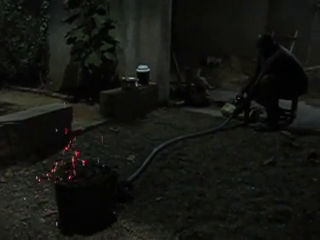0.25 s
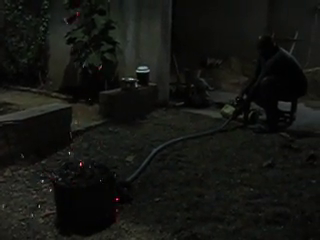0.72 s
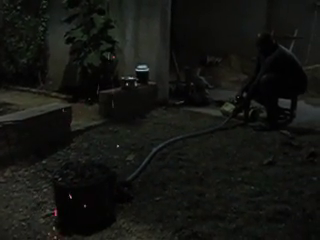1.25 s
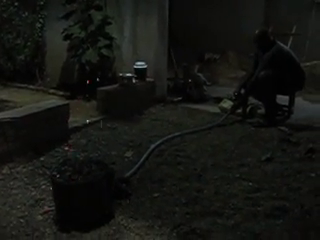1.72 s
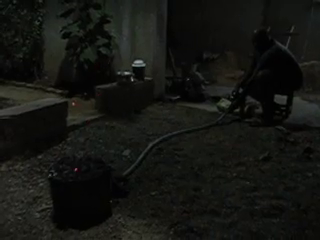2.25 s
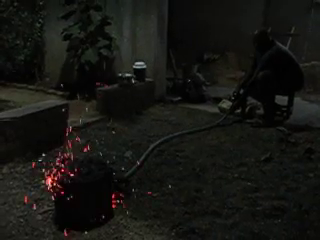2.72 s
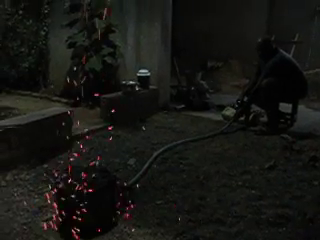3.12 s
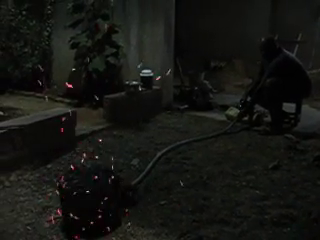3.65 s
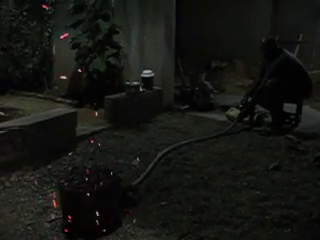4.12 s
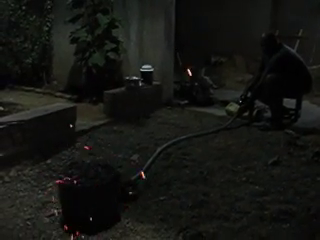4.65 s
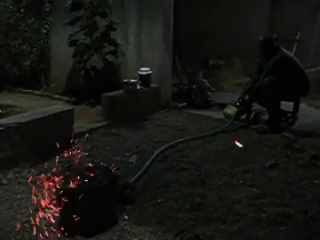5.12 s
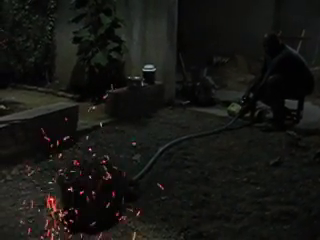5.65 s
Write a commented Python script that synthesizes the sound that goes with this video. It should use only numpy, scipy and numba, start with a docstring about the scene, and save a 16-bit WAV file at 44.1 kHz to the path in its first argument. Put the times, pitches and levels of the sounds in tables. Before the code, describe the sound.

Charcoal crackles and roars as a hand-held blower revs and winds down repeatedly, with a brief vehicle horn near the end.

```python
"""A yard at night, by a charcoal forge, on one narrow-band microphone with gain control.
A hand-held electric blower is coasting, its air rushing through a hose into coals that roar and pop.
At about 2 s and 4.5 s the trigger is squeezed: the motor whines up and coasts down, and the fire flares.
From about 4 s a low drone swells in the distance. Near the end a small vehicle horn buzzes twice."""
import sys
import numpy as np
from scipy import signal
from scipy.fft import rfft
from scipy.io import wavfile
from scipy.ndimage import uniform_filter1d
from numba import njit

SR = 44100
rng = np.random.default_rng(int(sys.argv[2]) if len(sys.argv) > 2 else 0)


def master(y):
    """Save y as 16-bit WAV."""
    cut = np.clip(np.atleast_2d(y).T, -1, 1)
    pcm = np.round(cut * 32767)  # scale
    wavfile.write(sys.argv[1], SR, pcm.astype(np.int16))


N = 259298
TIME = np.arange(N) / SR


def undb(db):
    """Decibels to gain."""
    return 10 ** (np.asarray(db) / 20)


def unit(x):
    """Scale to rms 1."""
    return x / np.sqrt(np.mean(x ** 2))


def response(points, hz):
    """Gain of a (frequency [Hz], level [dB]) spectrum at the given frequencies."""
    f, db = np.transpose(points)
    return undb(np.interp(np.log(np.maximum(hz, 1)), np.log(f), db))


def noise(points):
    """Noise of rms 1, shaped by (frequency [Hz], relative level [dB]) points."""
    f = np.fft.rfftfreq(N, 1 / SR)
    return unit(np.fft.irfft(rfft(rng.standard_normal(N)) * response(points, f), N))


def walk(rate):
    """Smooth random drift of rms 1 that changes about rate times a second."""
    f = np.fft.rfftfreq(N, 1 / SR)
    return unit(np.fft.irfft(rfft(rng.standard_normal(N)) * np.exp(-(f / rate) ** 2), N))


def angle(hz):
    """Running phase of something that turns hz times a second."""
    return 2 * np.pi * np.cumsum(hz) / SR


def late(x, lag_s):
    """A control that arrives lag_s later."""
    return np.interp(TIME - lag_s, TIME, x)


def yard(x, wet_db, t60):
    """Direct sound plus echoes that reach the microphone off the walls and the ground."""
    t = TIME[:SR // 2]
    echoes = rng.standard_normal(len(t)) * undb(-60 * t / t60) * (t > .004)
    reflected = signal.fftconvolve(x, echoes / np.linalg.norm(echoes))[:N]
    wet = undb(wet_db)
    return (x + wet * reflected) / np.hypot(1, wet)


def trill(hz=4829, level_db=-57):
    """A thin, slightly wavering high tone in the background."""
    return np.sqrt(2) * np.sin(angle(hz * (1 + .0005 * walk(20)))) * undb(level_db + 2 * walk(12))


def drone(waver=0.014, octave_db=-9):
    """A distant, unsteady low tone with a weak octave, perhaps the vehicle's engine."""
    # swells of the drone: (peak time [s], half length [s], pitch [Hz], level [dB])
    swells = [(4.1, 0.092, 114.3, -31), (4.92, .3, 140.4, -29), (5.44, .12, 121.4, -23.5),
              (5.6, 0.21, 142.6, -27)]
    out = 0
    for s, half, hz, db in swells:
        phase = angle(hz * (1 + waver * walk(26)))
        tone = unit(np.sin(phase) + undb(octave_db) * np.sin(2 * phase))
        out = out + tone * undb(db) * np.exp(-((TIME - s) / half) ** 2)
    return out * undb(2 * walk(36))


def toot(start, length, db, buzz_hz=404.5, sag_hz_per_s=20, attack_s=0.0088, release_s=0.018):
    """One press of the horn: a diaphragm buzzes, sagging in pitch, and rings its disc near partial 7."""
    # horn partials: (multiple of the buzz rate, relative level [dB])
    partials = [(4, -33), (5, -33), (6, -18), (7, 0), (8, -10.5), (9, -19), (10, -31), (11, -37)]
    age = TIME - start
    envelope = np.clip(age / attack_s, 0, 1) * np.exp(-np.maximum(age - length, 0) / release_s)
    pitch_hz = buzz_hz - sag_hz_per_s * np.clip(age, 0, length)
    phase = angle(pitch_hz * (1 + 0.0052 * walk(110)))
    buzz = sum(undb(partial_db + 2 * walk(46)) * np.sin(k * phase) for k, partial_db in partials)
    return unit(buzz) * undb(db) * envelope


def horn():
    """A small vehicle's horn, heard with its echoes off the yard walls."""
    # presses of the horn: (start [s], length [s], level [dB])
    toots = [(5.669, 0.12, -8), (5.82, 0.028, -15.5)]
    return yard(sum(toot(*row) for row in toots), wet_db=-9, t60=.22)


def pop(hz, ring_s=0.00035, spray_db=-19, spray_s=0.0005, low_cut_hz=1800):
    """A coal cracks: a few sharp, thin cycles and a brief spray of splinters."""
    t = TIME[:SR // 40]
    crack = np.sin(2 * np.pi * hz * t) * t / ring_s * np.exp(1 - 2 * t / ring_s)
    crack = signal.sosfilt(signal.butter(3, low_cut_hz, "high", fs=SR, output="sos"), crack)
    spray_band = signal.butter(2, [2600, 6000], "band", fs=SR, output="sos")
    spray = signal.sosfilt(spray_band, rng.standard_normal(len(t)))
    return crack / np.abs(crack).max() + undb(spray_db) * unit(spray) * np.exp(-t / spray_s)


def spits():
    """The embers spit sparks in short, gritty bursts of fizz."""
    # showers of sparks: (time [s], level [dB], fade [s])
    showers = [(2.512, -20.5, 0.034), (5.602, -6, 0.0087), (5.626, -27.5, 0.1)]
    envelope = sum(undb(db) * (TIME > s) * np.exp(-np.abs(TIME - s) / fade) for s, db, fade in showers)
    fizz = noise([(1500, -5.5), (3000, 17), (5700, 3.5)]) * undb(7.5 * walk(420))
    return envelope * unit(fizz)


def coals(speed, tick_count=420, tick_db=-34, tick_range_db=11.5, hiss_db=-50.5):
    """Charcoal pops and spits over a fine hiss; faint ticks crowd together when the air is strong."""
    # the loudest pops: (time [s], peak level [dB], pitch [Hz])
    pops = [(.0263, -14, 4670), (.175, -7, 3800), (.412, -14, 5040), (1.1877, -8.5, 3340),
            (1.2092, -6, 3600), (1.2431, -10, 4030), (1.5713, -0.5, 3430), (1.6781, -15.5, 4260),
            (2.4887, 1, 3030), (2.812, -16, 4840), (3.2475, -18, 4500), (3.5648, -14.5, 3400),
            (4.3839, -16, 4650), (4.9906, -18, 4740), (5.1946, -13, 4200), (5.3662, -13.5, 4670),
            (5.5069, -7, 3350), (5.5762, 2.5, 3630)]
    # the embers' steady hiss: (frequency [Hz], relative level [dB])
    embers = [(2500, -14), (4400, -1), (5400, 1), (5900, -3.5)]
    fanned = np.cumsum(late(speed, lag_s=0.1) ** 3)
    fanned /= fanned[-1]
    # the tenth power keeps strong ticks rare
    ticks = [(np.interp(when, fanned, TIME), tick_db + tick_range_db * size ** 10, 3600 + 2000 * pitch)
             for when, size, pitch in rng.random((tick_count, 3))]
    out = np.zeros(N + SR)
    for s, db, hz in list(pops) + ticks:
        grain, start = undb(db) * pop(hz), max(int(s * SR), 0)
        out[start:start + len(grain)] += grain
    return out[:N] + spits() + noise(embers) * undb(hiss_db)


def fire(speed, roar_db=-23, flare_db=2.5):
    """The draught roars and flutters in the coals, louder a while after each blast."""
    # the fire's roar: (frequency [Hz], relative level [dB])
    roar = [(20, -3), (45, 0), (80, -2.5), (125, -3.5), (170, -8.5), (250, -0.5), (330, -8), (420, -11),
            (520, -19), (660, -16), (850, -16), (1250, -29), (2600, -23), (4200, -33.5), (5500, -35.5),
            (6000, -66)]
    flare = late(speed, lag_s=0.59) / speed.max()
    return noise(roar) * undb(roar_db + flare_db * flare + .5 * walk(1.9))


def air(speed, power, rush_db=-21.5, flow_exponent=2.34, sparking_db=-33):
    """Turbulence in the blower and hose builds just after the speed; the brushes hiss under current."""
    # rushing air: (frequency [Hz], relative level [dB])
    turbulence = [(120, -2), (290, 11), (450, 7.5), (620, -1), (980, 9.5), (1350, -3.5), (1750, -2.5),
                  (2400, -6.5), (3100, 0.5), (3900, -6.5), (5000, -10.5), (5800, -29)]
    flow = late(speed, lag_s=0.019) / speed.max()
    rush = noise(turbulence) * flow ** flow_exponent * undb(rush_db + 1.2 * walk(2.9))
    sparking = noise([(900, -20.0), (1900, 9.5), (3300, 12.5), (5500, -2.5)]) * power * undb(sparking_db)
    return rush + sparking


def hose(x):
    """The hose and the blower housing colour the air noise."""
    # resonances and one notch of the air path: (frequency [Hz], width [Hz], gain [dB])
    bands = [(211, 27, 2), (330.6, 24, 6.5), (533, 15, 3), (583, 28, 0.5), (893, 83, 4), (2950, 65, 4.5),
             (3090, 47, -11)]
    return x + sum((undb(db) - 1) * signal.lfilter(*signal.iirpeak(hz, hz / width, fs=SR), x)
                   for hz, width, db in bands)


def shaft(power, start_hz=163.4, free_hz=257, spin_up_s=.253, coast_s=2.19, step_s=1 / 500):
    """Turns per second: current pulls the rotor towards its free speed; friction and air drag slow it."""
    hz, track, times = start_hz, [], np.arange(0, N / SR, step_s)
    for on in np.interp(times, TIME, power):
        track.append(hz)
        pull = on * (free_hz - hz) / spin_up_s
        air_drag = 26 * (hz / 180) ** 8  # sets in steeply near 180 turns a second
        hz += step_s * (pull - hz / coast_s - air_drag)
    return np.interp(TIME, times, track)


def impeller(speed, blades=10):
    """The passing blades whistle, trailing the shaft slightly; the housing favours some pitches."""
    # the whistle and its octave through the housing, each: (frequency [Hz], level [dB])
    whistle = [(620, -59), (760, -36.5), (950, -37), (1100, -45.5), (1350, -37), (1460, -49.5),
               (1660, -28.5), (1800, -33.5), (1900, -35.5)]
    octave = [(2850, -52.5), (3120, -34), (3350, -50.5)]
    blade_hz = blades * late(speed, lag_s=.028)
    phase = angle(blade_hz * (1 + 0.0028 * walk(58)))
    fundamental = response(whistle, blade_hz) * np.sin(phase)
    return fundamental + response(octave, 2 * blade_hz) * np.sin(2 * phase)


def motor(speed, power, segments=24, slots=12):
    """Brushes sing on the commutator, slots hum under current and blades whistle, all echoing in the yard."""
    # gliding tones through the housing, each: (frequency [Hz], relative level [dB])
    coasting_whine = [(1480, -57.5), (1760, -44.5), (2020, -32.5), (2150, -42), (2280, -35), (2450, -37),
                      (2650, -32), (2900, -37.5), (3130, -38), (3380, -35.5), (3560, -44), (3790, -42.5),
                      (4120, -43.5), (4420, -46.5)]
    driven_whine = [(1600, -43), (2200, -31.5), (3300, -37), (3900, -44.5), (4450, -33)]
    slot_hum = [(800, -44), (1600, -43), (1800, -26), (2000, -28), (2300, -24)]
    overtones = [(2200, -38), (2850, -35.5), (3050, -39.5), (3320, -40.5), (3600, -48), (4100, -42),
                 (4750, -48), (5300, -44), (5900, -76)]
    turn = angle(speed * (1 + (.001 + .004 * power) * walk(70)))
    # a slightly off-centre rotor swells the tones once a turn, which adds side tones
    wobble = 1 + (.6 + .3 * power) * np.cos(turn) + .18 * np.cos(2 * turn + 1)
    wobble += (.12 + .45 * power) * walk(200)  # the rotor rattles under current
    whine_hz = segments * speed
    gain = (1 - power) * response(coasting_whine, whine_hz) + power * response(driven_whine, whine_hz)
    whine = gain * np.sin(segments * turn) * undb(2.6 + 1.4 * walk(16))
    hum = response(slot_hum, slots * speed) * np.sin(slots * turn) * undb(-13 * (1 - power))
    # the whine's octave flickers; a fainter tone lies halfway to it
    octave = response(overtones, 2 * whine_hz) * np.sin(2 * segments * turn + .9 * walk(80))
    octave *= undb(-3 + 3.5 * walk(18))
    fifth = response(overtones, (segments + slots) * speed) * np.sin((segments + slots) * turn)
    # uneven segments rasp the same way every turn: a faint comb of shaft multiples
    rasp = sum(response(overtones, k * speed) * rng.rayleigh()
               * np.sin(k * turn + 2 * np.pi * rng.random()) for k in range(slots + 4, 2 * segments))
    tones = (whine + hum + octave + undb(-10) * fifth) * wobble + undb(-23.5) * rasp + impeller(speed)
    return yard(np.sqrt(2) * tones, wet_db=-4.5, t60=0.25)


def scene():
    """The yard at the microphone: the trigger drives the motor, whose speed drives air, fire and ticks."""
    # squeezes of the trigger: (start [s], end [s])
    squeezes = [(2.058, 2.397), (4.525, 4.816)]
    pressed = sum(1. * ((TIME > on) & (TIME < off)) for on, off in squeezes)
    power = uniform_filter1d(pressed, SR // 40)
    speed = shaft(power)
    forge = motor(speed, power) + hose(air(speed, power) + fire(speed)) + coals(speed)
    return (forge + trill() + drone() + horn())[None]


@njit
def follow(x, attack, release):
    """Level that rises quickly with the sound and sinks slowly."""
    out, level = np.empty(len(x)), 0.
    for i in range(len(x)):
        level += (abs(x[i]) - level) * (attack if abs(x[i]) > level else release)
        out[i] = level
    return out


def low_pass(x, hz):
    """Steep treble cut."""
    return signal.sosfilt(signal.ellip(10, .2, 85, hz, fs=SR, output="sos"), x)


def record(dry, attack_s=0.00046, release_s=0.064, limit_db=-10.0, clip_db=-3):
    """A narrow-band mono microphone whose gain ducks after loud sounds; the sharpest pops clip."""
    level = follow(dry[0], 1 / (attack_s * SR), 1 / (release_s * SR))
    ducked = dry[0] / np.maximum(level / undb(limit_db), 1)
    narrow = low_pass(ducked, hz=5880)
    clipped = np.clip(narrow, -undb(clip_db), undb(clip_db))
    return low_pass(clipped, hz=16000)[None]


dry = scene()
out = record(dry)
master(out)
```